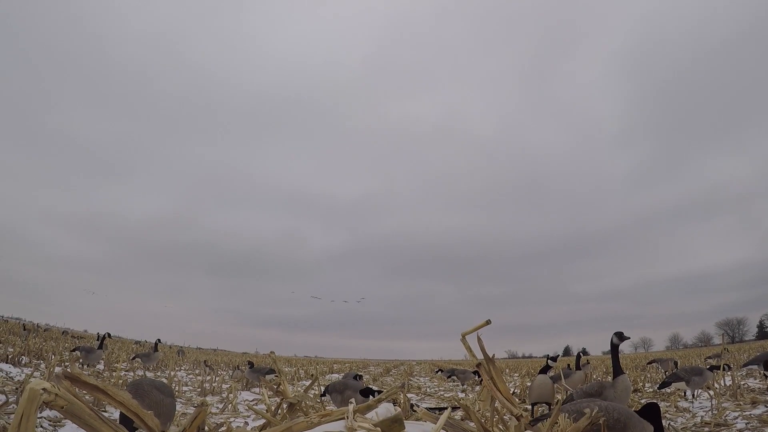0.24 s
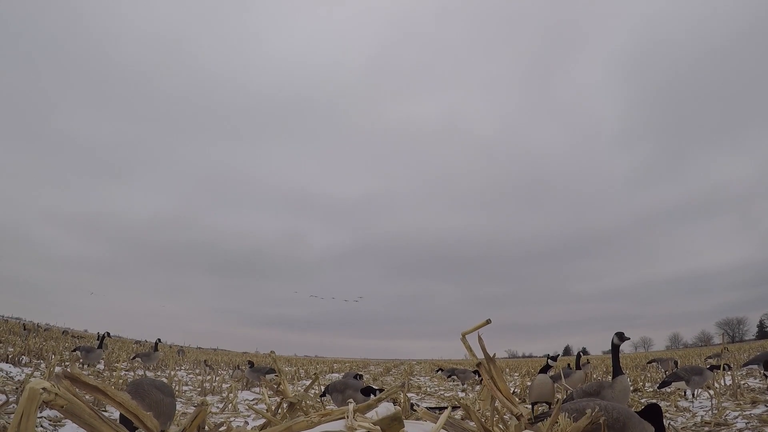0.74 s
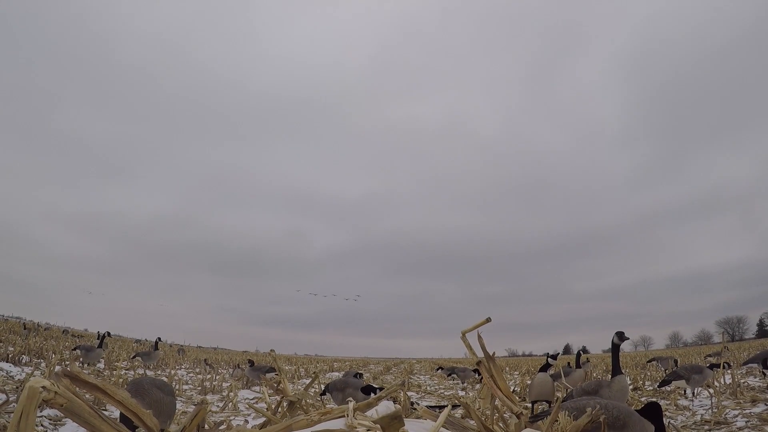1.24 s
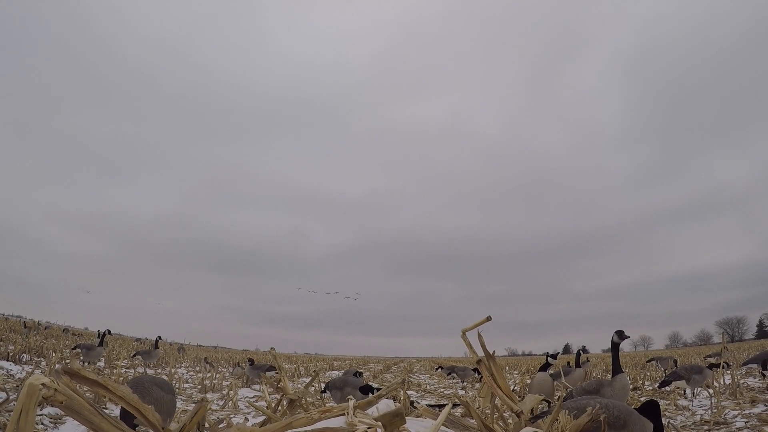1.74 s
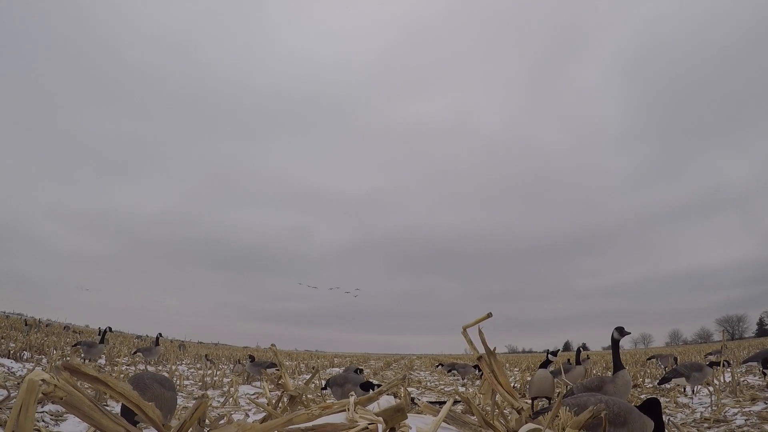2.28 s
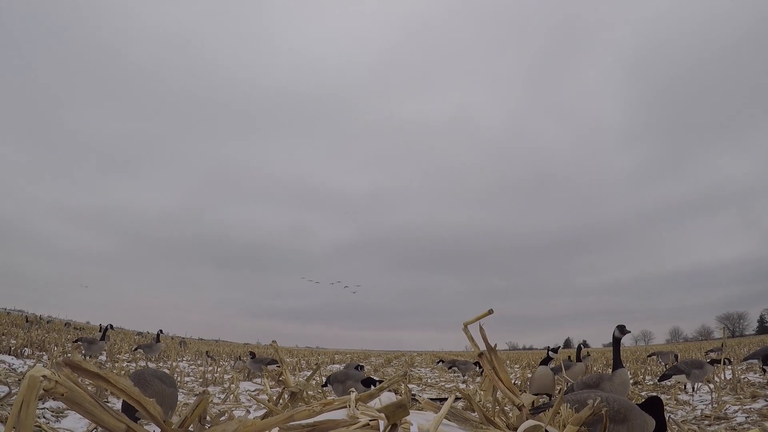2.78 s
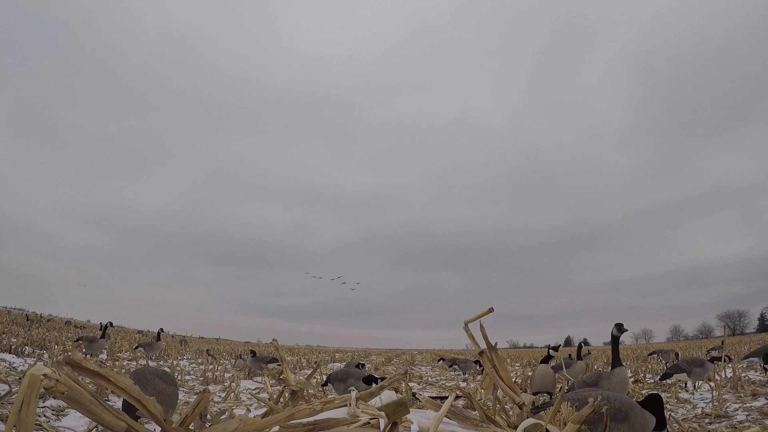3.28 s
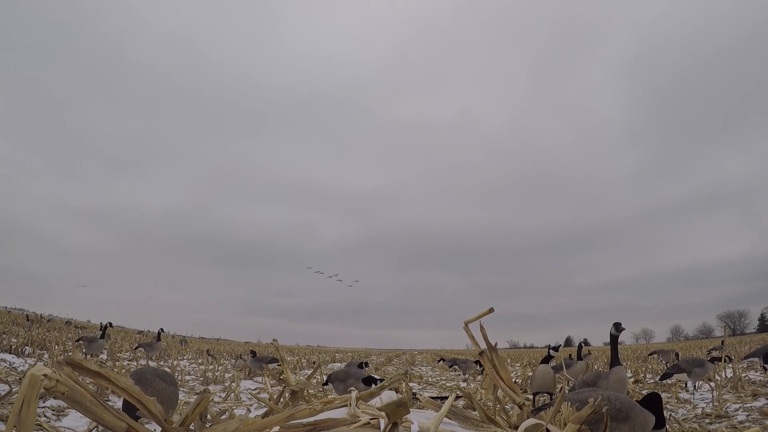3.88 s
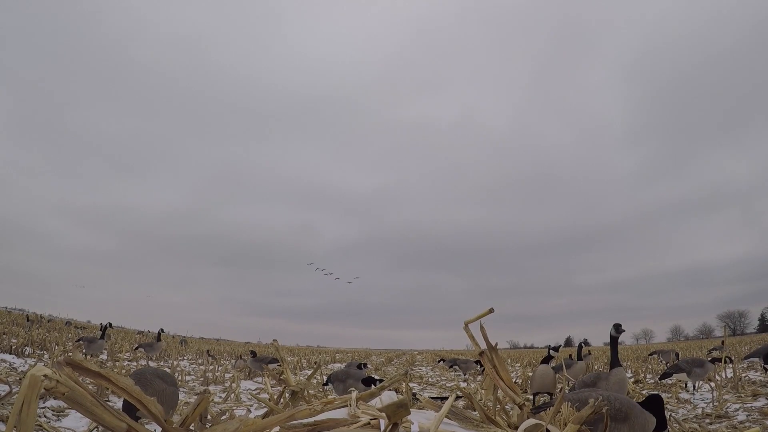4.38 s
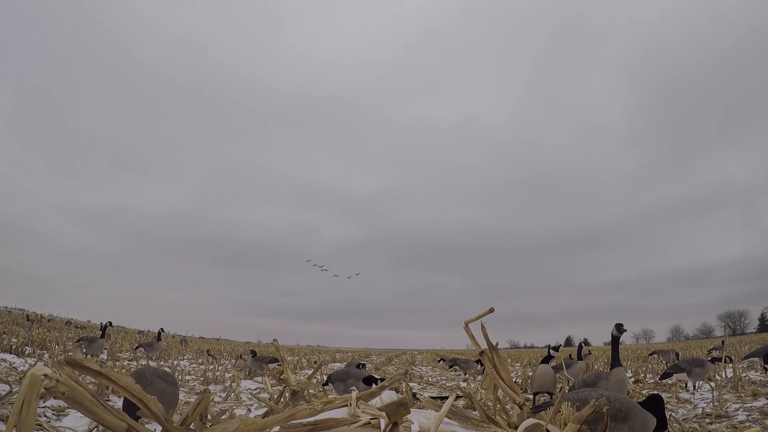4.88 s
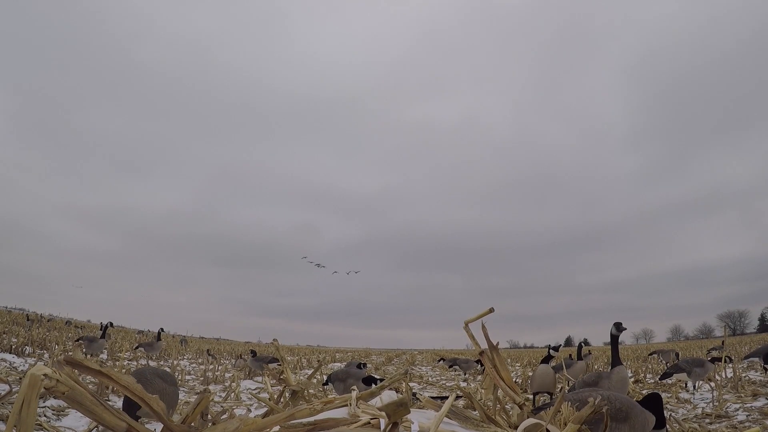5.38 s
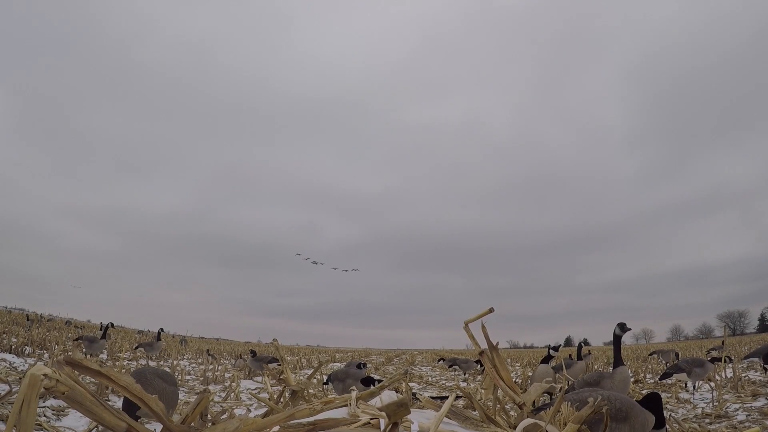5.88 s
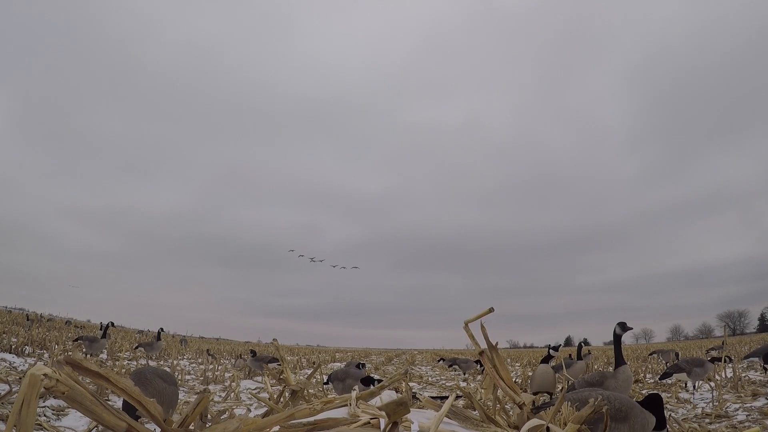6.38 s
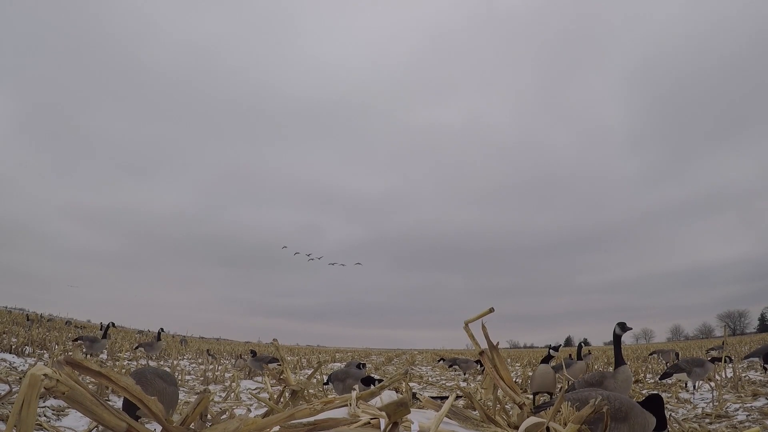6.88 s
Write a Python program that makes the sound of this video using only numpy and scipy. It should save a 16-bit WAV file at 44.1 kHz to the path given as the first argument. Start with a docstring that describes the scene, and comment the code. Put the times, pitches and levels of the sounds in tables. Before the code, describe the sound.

Short, raspy goose honks trade back and forth across an open field while low wind rumble on the microphone suddenly grows much louder.

```python
"""Low wind rumbles over a frozen stubble field, then two goose callers trade honks; one thin call
comes from far off. Each honk is a blown reed that growls low, then breaks up to about four times the
pitch, coloured by the resonances of barrel and hand. Dry stalks tick, and turbulence buffets a small
camera; as a gust hits, it fades from its wide microphone pair to one exposed, hissier microphone."""
import sys
import numpy as np
from scipy import signal
from scipy.fft import rfft, irfft, next_fast_len
from scipy.io import wavfile
from scipy.ndimage import uniform_filter1d

SR = 44100
rng = np.random.default_rng(int(sys.argv[2]) if len(sys.argv) > 2 else 0)


def master_out(mix):
    """Clip the mix to full scale and print it as 16-bit PCM to the path in sys.argv[1]."""
    frames = np.transpose(np.atleast_2d(mix))
    ceiling = np.clip(frames, -1, 1)
    pcm = np.round(ceiling * 32767).astype(np.int16)
    wavfile.write(sys.argv[1], SR, pcm)


N = 314419
T = np.arange(N) / SR

# fade to the single microphone: t/s, pair's gain/dB, pair's share of the wind/dB (capped at 0)
MIC_FADE = [(4.2, -3, 2), (4.33, -4, -7), (4.45, -5, -21), (4.55, -10, -22), (4.75, -20, -26),
            (4.97, -23, -33), (5.02, -100, -100)]
# distant noise and self-noise (the pair's mid and side, the single microphone): f/Hz, density/dB
MID_HISS = [(260, 5.5), (450, 3.5), (658, -0.5), (750, 1), (893, 0), (1530, -4), (1830, -6.5), (4790, -14),
            (6130, -14), (9640, -21.5), (12400, -25.5), (13500, -27), (14100, -49), (14700, -57)]
SIDE_HISS = [(260, -33), (450, 1.5), (1080, -3), (3370, -23), (3790, -28), (6130, -21.5), (7520, -21.5),
             (10200, -24.5), (12000, -30.5), (12900, -32.5), (14700, -67)]
SINGLE_HISS = [(350, -27.5), (600, -2.5), (784, -2), (933, -5.5), (1410, -6.5), (2260, -13.5),
               (3370, -21.5), (5920, -16), (7140, -18), (8620, -12), (9590, -11), (13000, -22),
               (14000, -32), (14700, -57)]
# extra high hiss, about 6-8 kHz, on the right microphone: f/Hz, density/dB
RIGHT_HISS = [(5200, -27), (6000, -1.5), (7800, 0), (9000, -14), (11000, -24.5)]
MID_DB, SIDE_DB, SINGLE_DB, RIGHT_HISS_DB = -55.5, -49, -53.5, -61.5
# stalks ticking in the wind: t/s, level/dB, f/Hz
TICKS = [(.2733, -59, 7430), (.7794, -65, 6480), (1.4396, -51, 7400), (1.6594, -60.5, 5890),
         (2.0757, -55, 7540), (2.1775, -51, 7760), (2.354, -54.5, 7140), (2.4134, -55, 6968),
         (3.0194, -62, 7200), (3.2111, -57, 7132), (4.6977, -53, 6050)]

# wind on the microphones: t/s, rumble level/dB, flutter minus rumble/dB
WIND = [(0, -38, -15), (.1, -43, -17), (.4, -31, -13), (.75, -31.5, -11.5), (.8, -41, -15), (.89, -37, -14),
        (.95, -43, -15), (1.0, -34, -14), (1.05, -31, -12), (1.4, -32, -18), (1.5, -38, -17.5),
        (1.88, -36, -19.5), (2.05, -40.5, -16), (2.55, -43.5, -15.5), (2.75, -37, -18), (3.05, -38.5, -20),
        (3.2, -44.5, -16), (3.38, -33.5, -16), (3.7, -42.5, -18), (3.95, -33, -14), (4.22, -39, -12),
        (4.39, -15.5, -20.5), (4.52, -18.5, -24), (4.8, -13.5, -15), (5.04, -13, -18), (5.07, -24, -20),
        (5.1, -13, -21), (5.38, -13, -24), (5.5, -22.5, -23.5), (5.72, -14, -25.5), (5.9, -20.5, -23),
        (6.02, -11.5, -17.5), (6.4, -13.5, -27), (6.7, -12, -20), (6.98, -14, -21), (7.13, -13, -20)]
# wind favours one port: t/s, left minus right/dB
WIND_LEAN = [(0.0, 4), (0.55, 7.0), (3.27, 4), (3.31, 7.5), (4.2, 6), (4.5, -2)]
# turbulence spectra: f/Hz, density/dB
PAIR_RUMBLE = [(8.8, -37), (15, -6), (43, 3.5), (80, 2.5), (124, 1), (220, -16), (290, -42.5), (480, -120)]
SINGLE_RUMBLE = [(8.8, -65), (15, 1.5), (38, 1), (81, -2.5), (140, -11), (174, -21.5), (220, -33),
                 (290, -41.5), (480, -120)]
FLUTTER = [(110, -18), (170, 2), (250, -5.5), (350, -16), (500, -25.5), (800, -41.5), (1500, -52)]
GUSTY_DB, GUSTS_PER_S, FLURRY_DB, FLURRIES_PER_S = 2.5, 26, 4, 32  # random swells of rumble, flutter
SWAY_DB, SWAYS_PER_S = 2.5, 10  # random sway between the ports
SURGE_DB, SURGE_S = 3.5, .023  # the wind surges around each slap
GUST_LIMIT = .77  # the port's pressure swing rounds off here
# eddies that slap the ports: t/s, level/dB, left minus right/dB, spectral reach/Hz
SLAPS = [(.301, -34.5, 20, 350), (.594, -28, 15, 350), (.694, -30, 12, 400), (.715, -23.5, 8, 520),
         (.755, -19, 12, 680), (.905, -33, 5, 600), (.978, -30, 16, 560), (1.0, -35, 10, 450),
         (1.039, -27.5, 21, 480), (1.1, -23, -3, 400), (1.202, -20.5, -11, 600), (1.223, -23, -13, 480),
         (1.383, -30, -5, 450), (1.406, -29, -14, 380), (2.962, -26, -16, 650), (4.528, -26, 0, 760),
         (4.638, -22, 0, 600), (4.652, -16, 0, 560), (4.675, -21, 0, 560), (4.748, -25, 0, 400),
         (4.776, -15, 0, 480), (4.803, -14.5, 0, 520), (4.816, -11, 0, 700), (4.829, -19, 0, 600),
         (4.963, -20, 0, 600), (4.992, -25, 0, 450), (5.045, -24, 0, 420), (5.111, -18, 0, 500),
         (5.423, -28, 0, 400), (5.998, -22, 0, 480), (6.029, -20, 0, 480), (6.118, -26, 0, 440),
         (6.134, -21, 0, 420), (6.198, -21, 0, 400), (6.289, -22, 0, 440), (6.398, -20, 0, 420),
         (6.529, -20, 0, 600), (6.68, -24, 0, 460), (6.704, -19, 0, 450), (6.731, -25, 0, 480),
         (6.756, -19, 0, 500), (6.873, -26, 0, 420), (6.935, -21, 0, 520), (6.985, -29, 0, 420)]
# a slap's thump and its upper edge: f/reach, density/dB
SLAP_BODY = [(.2, -4), (.35, 3), (.55, -1), (1.05, -20), (1.6, -36)]
SLAP_EDGE = [(.4, -8), (.7, -3), (1.1, -12), (1.7, -24), (2.6, -40)]
SLAP_BODY_S, SLAP_EDGE_S, SLAP_EDGE_DB = .006, .0025, -11

# barrel resonances of each caller, in the honk and in the growl: f/Hz, level/dB
FRONT_HONK = [(400, -16), (600, -6.5), (800, 1), (1000, -15), (1200, -3.5), (1400, -3.5), (1600, -3),
              (1900, -18), (2200, -16.5), (2350, -25), (2550, -24), (2900, -31), (3400, -35)]
FRONT_GROWL = [(400, -18.5), (700, -2), (1000, -10.5), (1400, 0.5), (1800, -13.5), (2400, -26), (3300, -36)]
RIGHT_HONK = [(400, -2), (690, 1), (1100, 7.5), (1400, -10), (2050, -16), (2700, -50), (3500, -52),
              (4030, -32), (4250, -52)]
RIGHT_GROWL = [(450, -32), (680, -24.5), (820, -5), (940, 3), (1080, -3.5), (1230, -12), (1500, -39),
               (2050, -34), (2500, -40), (3300, -59)]
FAR_HONK = [(400, -30), (800, -14), (1300, -4), (1600, -3), (1900, -16), (3300, -30)]
# bright bite of the reed's edge: f/Hz, level/dB
REED_BITE = [(3400, -38), (3900, -20), (4300, -13), (4750, -20.5), (5200, -23.5), (6200, -20.5),
             (7000, -32.5), (8000, -38.5)]
# lines 0, 1/4, 1/2 and 3/4 of the way from one honk harmonic to the next: level/dB
BUZZ_DB = [0, -3.5, -8, 3.5]
# the housing shades the left port from the right caller: f/Hz, left minus right/dB, left lag/rad
HOUSING_SHADOW = [(300, -3, .7), (680, -5.5, 1.6), (860, -12.5, 2.45), (1350, -14, 3.8), (2050, -17, 4.9),
                  (4000, -8, 7.8), (9000, -8, 17)]
# calls: caller, break t/s, growl length/s, honk length/s, growl f/Hz, honk f/Hz, closing fall/fraction,
# growl level/dB, honk level/dB, then relative levels: buzz/dB, bite/dB, sheen/dB, crack/dB
HONKS = [("right", .351, .068, .064, 171, 716, 0.184, -31.5, -25.5, -32, -42, 0, -17),
         ("front", .404, .021, .067, 199.7, 837, .17, -45, -46.5, -3.5, -3.5, -5, -13),
         ("front", .49, .03, .056, 178, 780, .1, -47, -41, -4.5, -7, -4, -15),
         ("front", 1.091, .086, .049, 172.3, 766, .07, -55.5, -46.5, 2, -11.5, 4.5, -13),
         ("front", 1.478, .08, .056, 203, 848, .17, -49, -42.5, -15, -15, 0, -5),
         ("right", 1.685, .008, .012, 180, 700, .1, -48, -46, 3, -10, 0, -13),
         ("front", 1.839, .063, .09, 175.3, 795, 0.083, -52.5, -40.5, -3.5, -3, 0, -13),
         ("far", 2.114, .03, .175, 181, 752, .17, -61, -51.5, -17, -18, 0, -13),
         ("front", 2.549, .105, .037, 177.2, 764, .1, -55, -50, -1.5, -15, 0, -13),
         ("front", 2.796, .08, .048, 194.8, 834, .2, -52, -43.5, -2, -4, -2, -13),
         ("front", 3.266, .087, .066, 182.8, 804, .04, -47, -38, -2, -10, 15, -14),
         ("right", 3.405, .059, .044, 169, 673, 0.2, -29, -28, -30, -30, 12, -15),
         ("front", 3.8, .135, 0.069, 190, 797, .08, -51.5, -40, -1.3, -5, 1, -13),
         ("right", 3.908, .064, .06, 174.7, 665, 0.16, -32.5, -29, -32, -34, 0, -13),
         ("front", 4.039, 0.07, 0.0613, 170, 830, 0.196, -51, -46.5, -0.92, -9, -4, -13),
         ("front", 4.394, .135, .078, 190, 800, .07, -47.5, -36, -20, -1, 1, -10),
         ("right", 4.418, .048, .04, 173, 680, .14, -40, -36.5, -22, -27, 0, -13),
         ("front", 4.794, .045, .052, 194, 800, .08, -43, -40, -16, 5, 3, -13),
         ("front", 5.082, .034, .067, 160, 783, .12, -48, -43.5, -1.7, -1, 7.5, -13),
         ("front", 5.153, .021, .042, 168.7, 614, .06, -44.5, -45, -10, -1, 3, -13),
         ("front", 5.636, .045, 0.0604, 175.7, 787, 0.086, -45, -43, 1, -4, 4, -13),
         ("front", 6.36, .017, .04, 177, 823, .1, -48, -45, -1, -1, -4, -13),
         ("right", 6.697, .062, .015, 197, 675, .21, -47, -57, -48, -14, 0, -13),
         ("front", 6.716, .029, .067, 190, 790, .08, -49, -42.5, -1, -2, -2, -15)]
# ways of blowing: hand opening/fraction, scoop/fraction, sag exponent, swell/dB, thinning/(dB per dB)
FRONT_STYLE, RIGHT_STYLE = (.12, .012, 1.9, 8, .9), (.2, .1, 6.5, 4, 0)
FAR_STYLE = (.12, .012, 1.9, 8, 0)
FULL_CHEST_DB = -44  # above this level, thinning weakens a honk's lowest lines
INPUT_DB, TOP_HZ = -.4, 14900
ANTIPHASE = np.array([[1], [-1]])  # opposite signs on left and right


def undb(db):
    """Amplitude ratio of a level in decibels."""
    return 10 ** (np.asarray(db) / 20)


def colour_db(table, hz):
    """Spectral envelope interpolated on a log-frequency axis; silence outside it."""
    f, db = np.transpose(table)
    return np.interp(np.log(hz + 1), np.log(f), db, left=-120, right=-120)


def noise(table, count=1, size=N):
    """Spectral shaping of white noise: uncorrelated signals of one colour, rms 1."""
    fast = next_fast_len(size)
    gain = undb(colour_db(table, np.arange(fast // 2 + 1) * SR / fast))
    shaped = irfft(rfft(rng.standard_normal((count, fast))) * gain, fast)
    return shaped[:, :size] / shaped.std(axis=1, keepdims=True)


def walk(rate, size=N, count=1):
    """Random modulation: values held 1 / rate seconds and smoothed twice; spread near 1."""
    hold = int(SR / rate)
    held = np.repeat(rng.standard_normal((count, size // hold + 1)), hold, axis=1)
    return 1.585 * uniform_filter1d(uniform_filter1d(held, hold), hold)[:, :size]


def add(out, start_s, sound, pan_db):
    """Superposition: mix a sound in, with a left minus right level difference."""
    i = int(start_s * SR)
    sound = sound[..., :N - i]
    out[:, i:i + sound.shape[-1]] += sound * undb(ANTIPHASE * pan_db / 2)


def hiss(pair):
    """Noise floor: distant noise, self-noise and extra high hiss on the right add incoherently."""
    wide = undb(MID_DB) * noise(MID_HISS) + undb(SIDE_DB) * noise(SIDE_HISS) * ANTIPHASE
    wide[1] += undb(RIGHT_HISS_DB + 1.1 * walk(14)[0]) * noise(RIGHT_HISS)[0]
    return pair * wide + (1 - pair) * undb(SINGLE_DB) * noise(SINGLE_HISS)


def stalk_ticks(pair):
    """Friction: a dry stalk to the right scrapes, giving a few milliseconds of narrow-band noise."""
    out, swell = np.zeros((2, N)), np.hanning(int(.005 * SR))
    for s, db, hz in TICKS:
        band = [(.75 * hz, -30), (.93 * hz, 0), (1.0637 * hz, -2), (1.3 * hz, -30)]
        scrape = noise(band, size=len(swell))[0]
        add(out, s, undb(db) * swell ** 2 * scrape, pan_db=-17 * pair[int(s * SR)])
    return out


def wind(share):
    """Turbulent pressure: each port has its own rumble and its own quick bursts of flutter."""
    times, *levels = np.transpose(WIND)
    rumble_db, flutter_db = (np.interp(T, times, db) for db in levels)
    surge = np.minimum(sum(np.exp(-((T - slap[0]) / SURGE_S) ** 2) for slap in SLAPS), 1)
    rumble_db = rumble_db + SURGE_DB * surge + GUSTY_DB * walk(GUSTS_PER_S)[0]
    lean_db = np.interp(T, *np.transpose(WIND_LEAN)) + SWAY_DB * walk(SWAYS_PER_S)[0]
    rumble = np.vstack([noise(PAIR_RUMBLE, count=2), noise(SINGLE_RUMBLE)])
    rumble *= undb(1.5 * walk(20, count=3))
    flutter = noise(FLUTTER, count=3) * undb(flutter_db + FLURRY_DB * walk(FLURRIES_PER_S, count=3))
    left, right, single = (rumble + flutter) * undb(rumble_db)
    # eddies rolling across the housing push one port while they pull the other
    push = undb(-6.5) * (flutter[0] - flutter[1]) * undb(rumble_db) * ANTIPHASE
    ports = np.array([left * undb(lean_db / 2), right * undb(-lean_db / 2)]) * undb(4.5) + push
    return share * ports + np.sqrt(1 - share ** 2) * single


def eddy_slaps(share):
    """Pressure transients: an eddy gives each port its own low thump with a briefer, brighter edge."""
    out, t = np.zeros((2, N)), np.arange(int(.06 * SR)) / SR - .025
    for s, db, pan_db, reach_hz in SLAPS:
        body = noise(np.multiply(SLAP_BODY, [reach_hz, 1]), count=3, size=len(t))
        edge = noise(np.multiply(SLAP_EDGE, [reach_hz, 1]), count=3, size=len(t))
        burst = body * np.exp(-(t / SLAP_BODY_S) ** 2)
        burst += undb(SLAP_EDGE_DB) * edge * np.exp(-(t / SLAP_EDGE_S) ** 2)
        *ports, single = burst / np.abs(burst).max(axis=1, keepdims=True)
        apart = share[int(s * SR)]
        slap = undb(-3.5) * apart * np.array(ports) + (1 - apart) * single
        add(out, s - .021, undb(db) * slap, apart * pan_db)
    return out


def housing_shadow(sound):
    """Diffraction round the housing: sound from the right reaches the left port weaker and later."""
    hz, db, lag = np.transpose(HOUSING_SHADOW)
    bins = np.arange(513) * SR / 1024
    impulse = irfft(undb(np.interp(bins, hz, db)) * np.exp(-1j * np.interp(bins, hz, lag)))
    shaded = signal.oaconvolve(sound[0], np.roll(impulse, 512))[512:512 + N]
    return np.array([shaded, sound[1]])


def field_scatter(sound):
    """Scattering: stubble and snow return a short, faint tail behind each call."""
    t = np.arange(int(.12 * SR)) / SR
    impulse = rng.standard_normal((2, len(t))) * np.exp(-t / .025) * undb(-43.5)
    return signal.fftconvolve(sound, impulse, axes=1)[:, :N]


def reed_honk(call, honk_colour, growl_colour, style):
    """Register break: a reed slaps slowly, rich in harmonics, then every fourth harmonic takes over."""
    growl_s, honk_s, growl_hz, honk_hz, fall, *levels = call
    growl_db, honk_db, buzz_db, bite_db, sheen_db, crack_db = levels
    opening, scoop, sag, swell_db, thinning = style
    t = np.arange(int((growl_s + honk_s + .015) * SR)) / SR - growl_s  # zero at the break
    size = len(t)
    broken = np.clip(t / .011 + .5, 0, 1)  # 0 in the growl, 1 in the honk
    early, late = np.clip(-t / growl_s, 0, 1), np.clip(t / honk_s, 0, 1.05)
    # pressure builds through the growl; the honk scoops up, holds, then sags as the air runs out
    build = (1 - early) ** 1.3
    arch = 1 - scoop * np.exp(-np.maximum(t, 0) / .005) - fall * late ** sag
    hz = (1 - broken) * growl_hz * (1 - .11 * early ** 1.5) + broken * arch * honk_hz / 4
    hz *= 1 + (.011 - .007 * broken) * walk(120, size)[0]
    phase = 2 * np.pi * np.cumsum(hz) / SR
    k = np.arange(2, 42)[:, None]  # harmonic numbers of the slow cycle
    edge = undb(colour_db(REED_BITE, k * hz) + bite_db + sheen_db * (k > 26))
    between_db = np.where(k % 4 == 0, 0, buzz_db + np.array(BUZZ_DB)[k % 4])
    chest_db = thinning * (FULL_CHEST_DB - honk_db) * (k < 5)
    # as the pressure drops, the honk's second harmonic (k = 8) outlasts the lines around it
    dying_db = -late ** sag * 10 * np.abs(np.log2(k / 8))
    honk = undb(colour_db(honk_colour, k * hz)) + edge
    honk *= undb(honk_db + between_db + chest_db + dying_db)
    # the cupped hand opens during the growl and lifts its resonance
    hand = undb(colour_db(growl_colour, k * hz * (1 + opening * early)))
    growl = (hand + edge * build) * undb(growl_db)
    shimmer = undb((2.5 - broken + k / 40 * undb(buzz_db * broken)) * walk(90, size, count=len(k)))
    lines = np.sin(k * phase + 2 * np.pi * rng.random((len(k), 1)))
    tone = (((1 - broken) * growl + broken * honk) * shimmer * lines).sum(axis=0)
    # air rasps past the reed once per slap, more when the honk buzzes
    effort = (1 - broken) * build * undb(growl_db) + broken * undb(honk_db + buzz_db - 2.1 * late)
    rasp = noise(REED_BITE, size=size)[0] * (1 + np.cos(phase)) * effort
    rasp *= undb(bite_db - 15.5 + sheen_db / 2)
    # the loose reed leaks hoarse air under the growl, then cracks as it jumps to the high note
    leak = noise(growl_colour, size=size)[0] * (1 - broken) * undb(growl_db - 13)
    crack = noise(honk_colour, size=size)[0] * np.exp(-(t / .007) ** 2) * undb(honk_db + crack_db)
    attack = np.clip((1 - early) * growl_s / (.0028 * swell_db), 0, 1) * undb(-swell_db * early)
    release = np.clip((honk_s + .0099 - t) / .033, 0, 1) * undb(-3 * late ** 2)
    return (tone + rasp + leak + crack) * attack * release


def goose_callers(pair):
    """Level and time differences place the callers ahead and to the right while the pair is open."""
    front, right = np.zeros((2, 2, N))
    voices = {"front": (front, FRONT_HONK, FRONT_GROWL, FRONT_STYLE),
              "right": (right, RIGHT_HONK, RIGHT_GROWL, RIGHT_STYLE),
              "far": (front, FAR_HONK, FRONT_GROWL, FAR_STYLE)}
    for caller, break_s, growl_s, *rest in HONKS:
        track, *voice = voices[caller]
        add(track, break_s - growl_s, reed_honk((growl_s, *rest), *voice), pan_db=0)
    wide = housing_shadow(right) * undb(2.5)
    ground_bounce = .12 * np.roll(front[0], 60) * ANTIPHASE
    # the front caller stands a little to the right, so the left port hears him a shade later
    skew = -.35 * np.gradient(front[0]) * ANTIPHASE
    space = ground_bounce + skew + field_scatter(front + wide)
    # the single microphone hears the front caller's midrange duller
    midrange = signal.sosfilt(signal.butter(1, [1150, 1800], "bandpass", fs=SR, output="sos"), front)
    spread = pair / pair[0]
    return front - .4 * (1 - pair) * midrange + pair * space + spread * wide + (1 - spread) * right


def scene():
    """Superposition of hiss, softly saturating wind, stalks and calls as the microphones crossfade."""
    times, *fades = np.transpose(MIC_FADE)
    pair, wind_share = (np.minimum(undb(np.interp(T, times, db)), 1) for db in fades)
    floor = hiss(pair)
    gusts = GUST_LIMIT * np.tanh((wind(wind_share) + eddy_slaps(wind_share)) / GUST_LIMIT)
    return floor + gusts + goose_callers(pair) + stalk_ticks(pair)


def record(dry):
    """Band limiting: the recorder applies a constant gain and a steep low-pass filter."""
    lowpass = signal.ellip(8, .2, 60, TOP_HZ, fs=SR, output="sos")
    return signal.sosfilt(lowpass, undb(INPUT_DB) * dry)


dry = scene()
out = record(dry)
master_out(out)
```